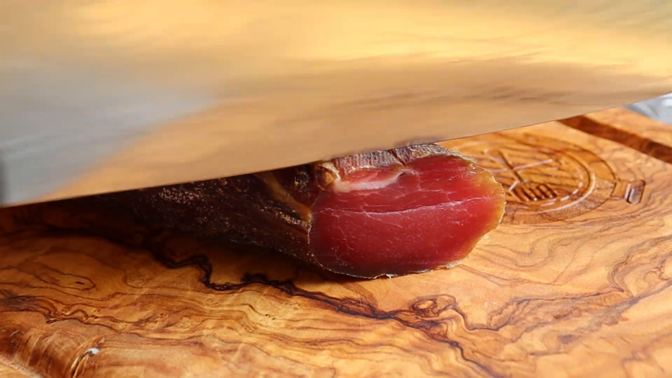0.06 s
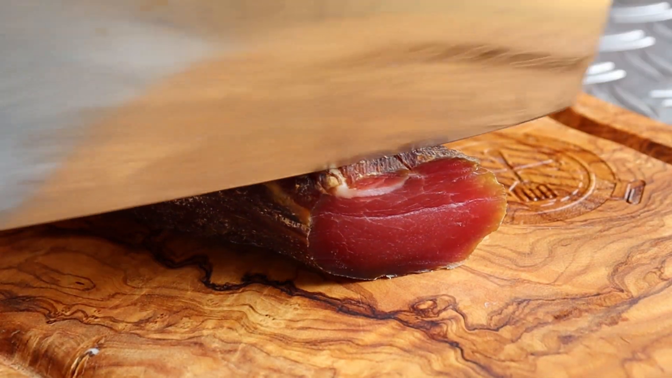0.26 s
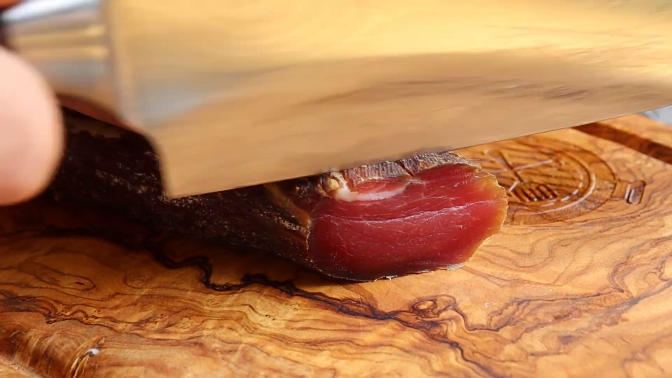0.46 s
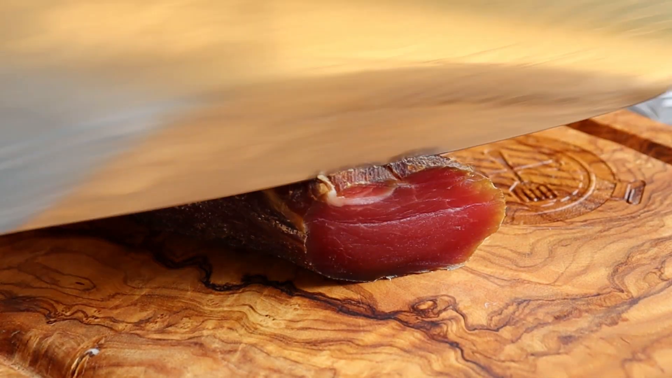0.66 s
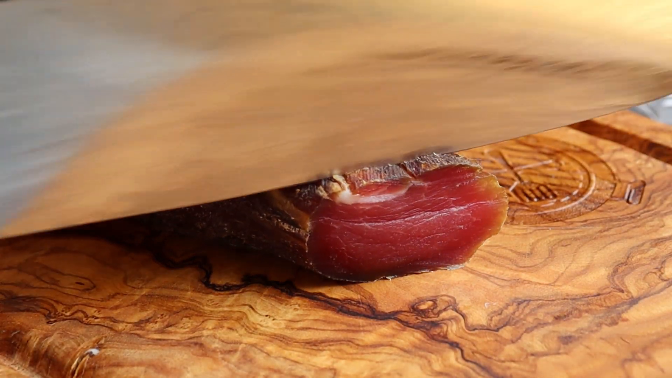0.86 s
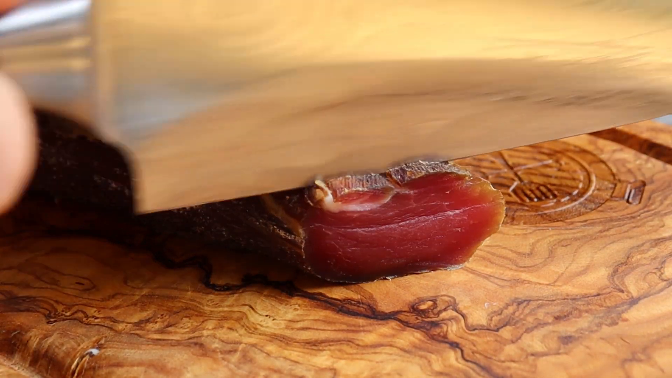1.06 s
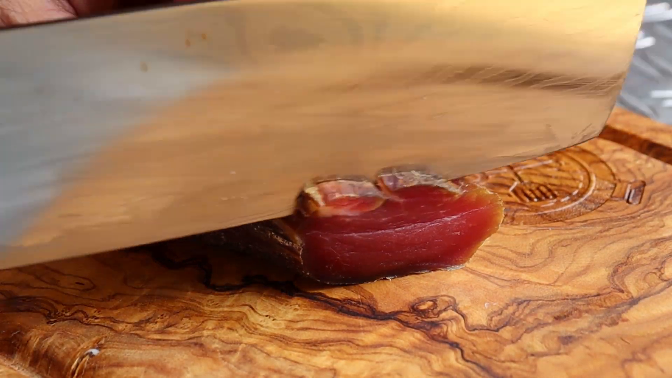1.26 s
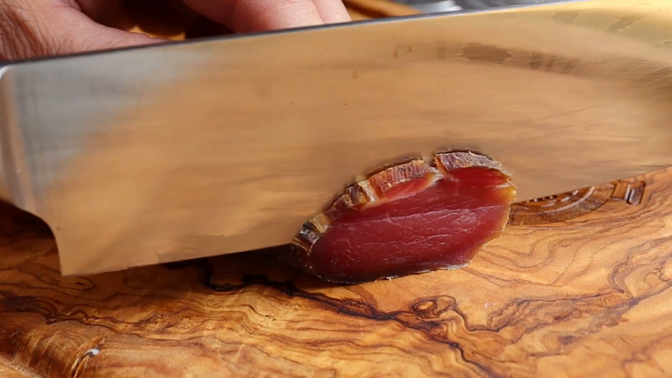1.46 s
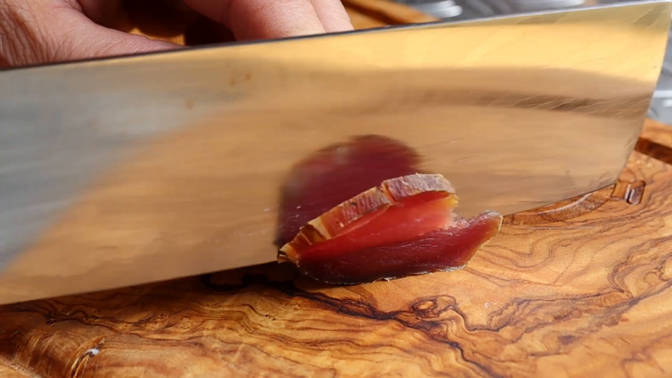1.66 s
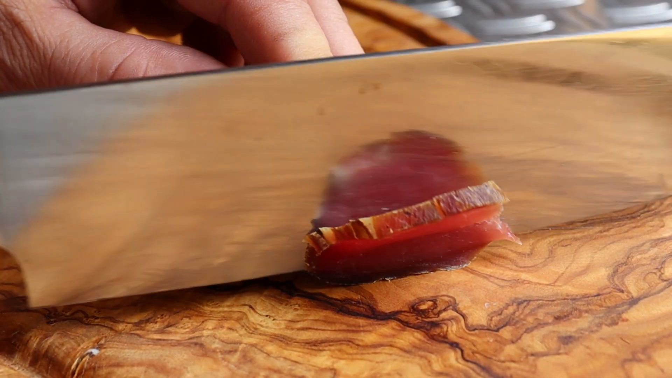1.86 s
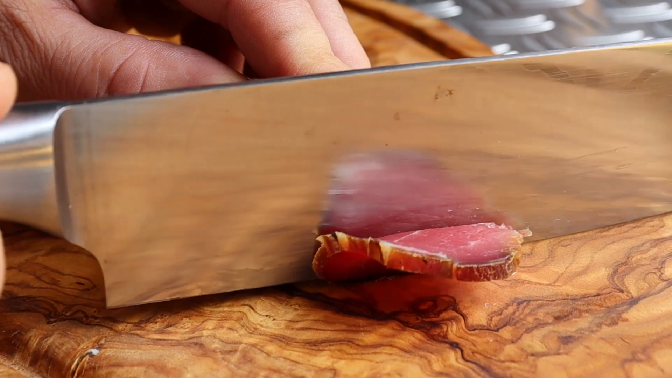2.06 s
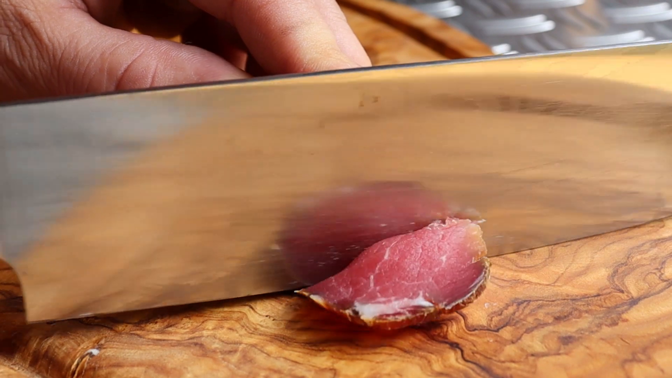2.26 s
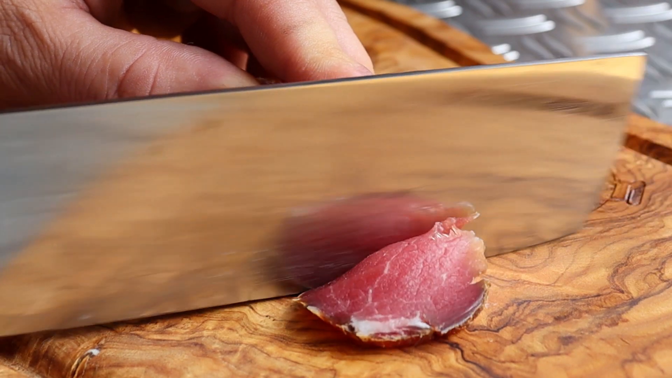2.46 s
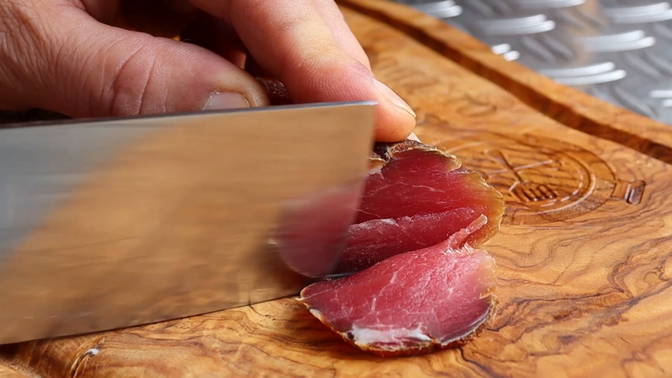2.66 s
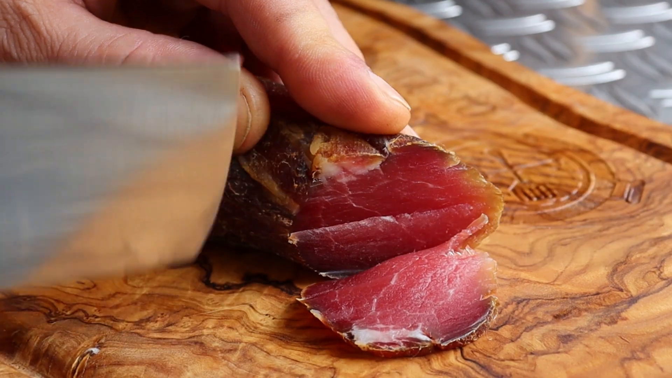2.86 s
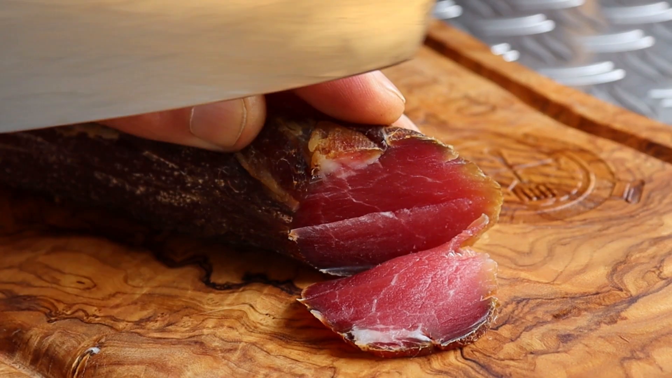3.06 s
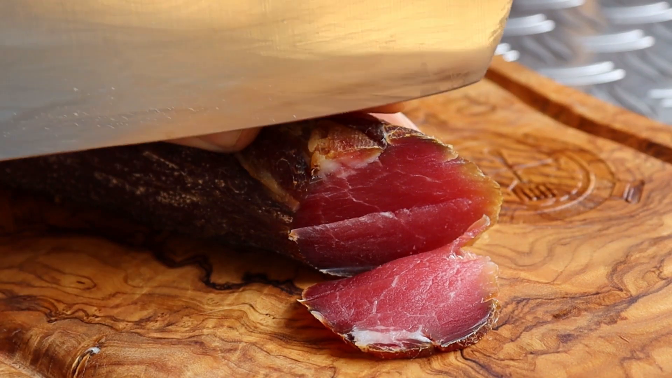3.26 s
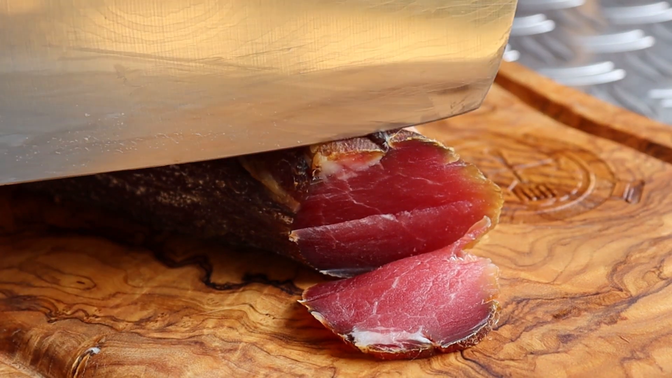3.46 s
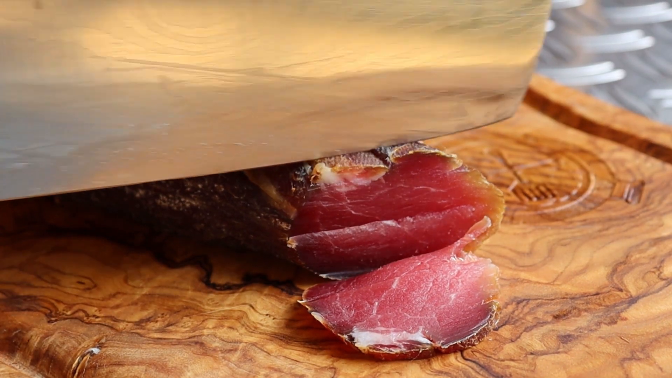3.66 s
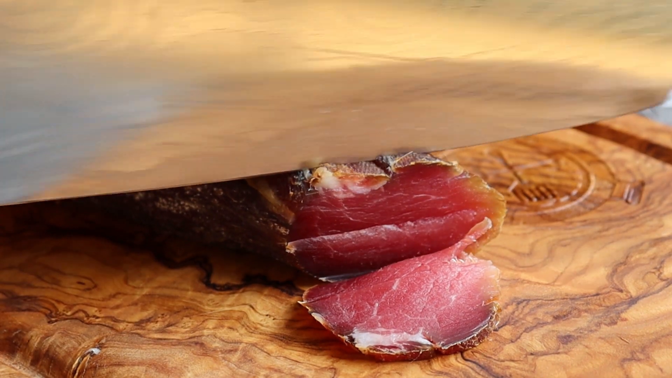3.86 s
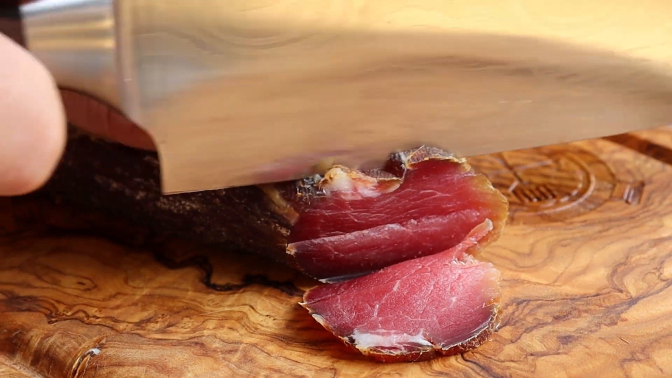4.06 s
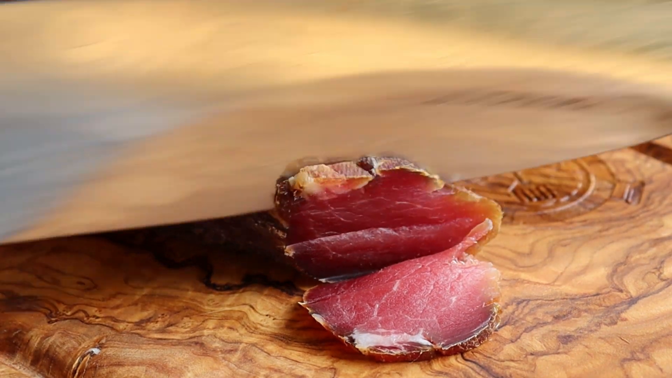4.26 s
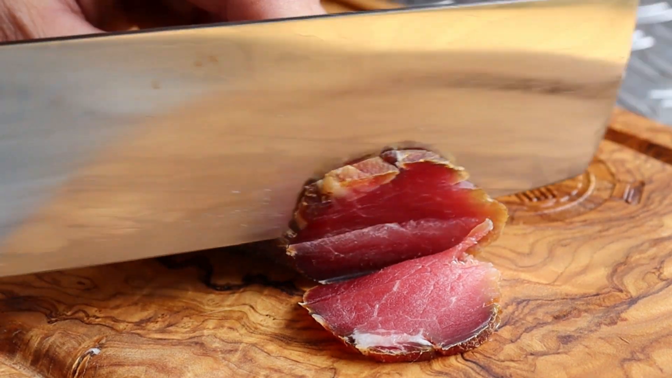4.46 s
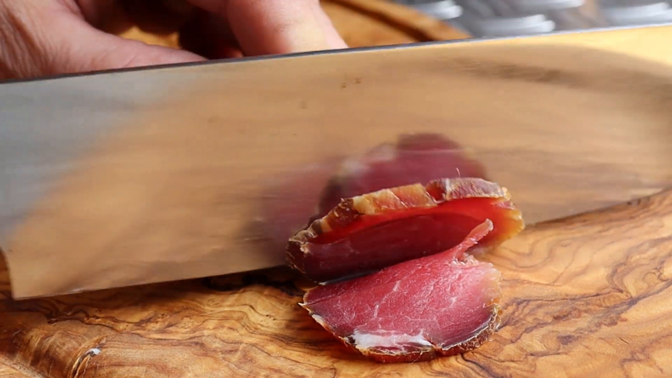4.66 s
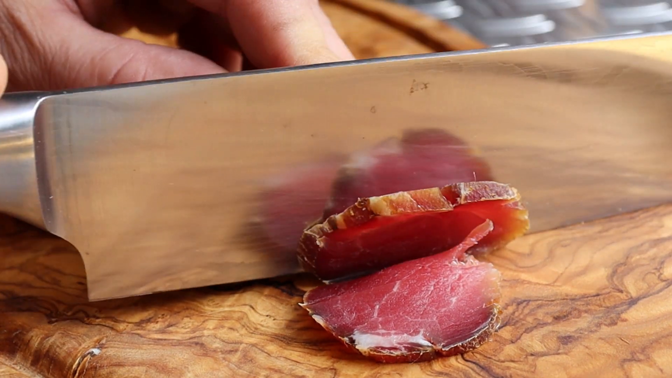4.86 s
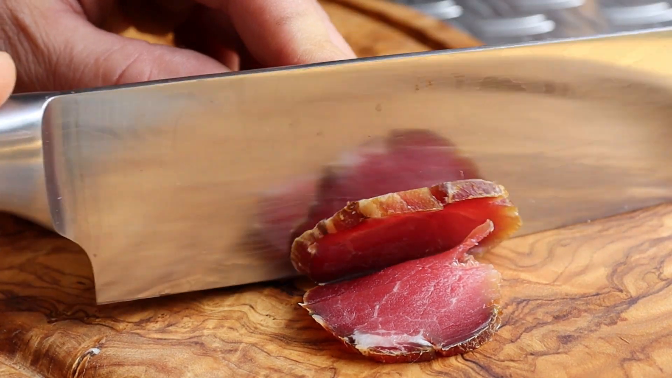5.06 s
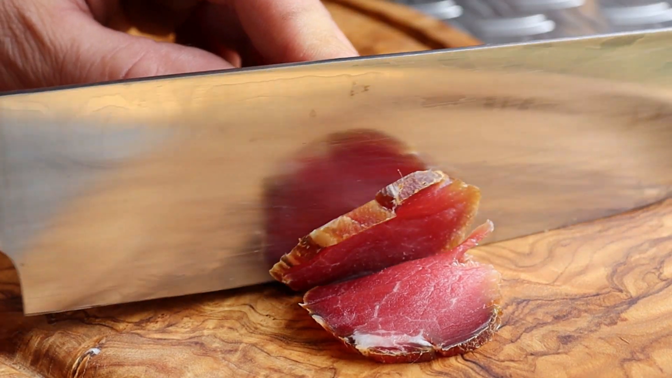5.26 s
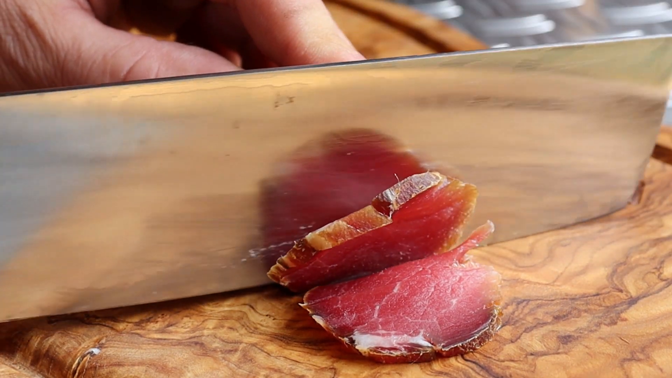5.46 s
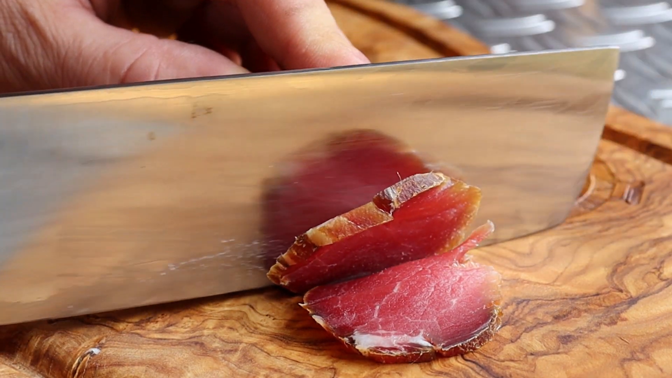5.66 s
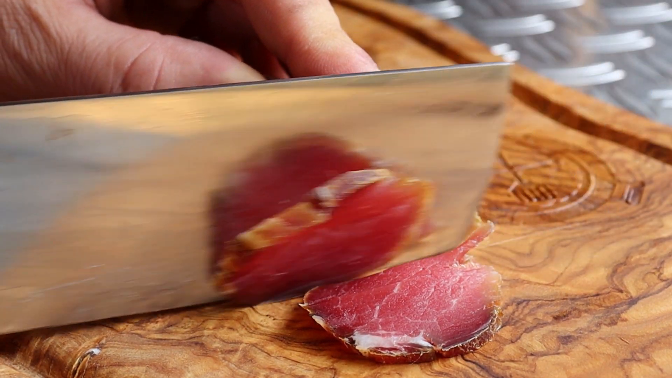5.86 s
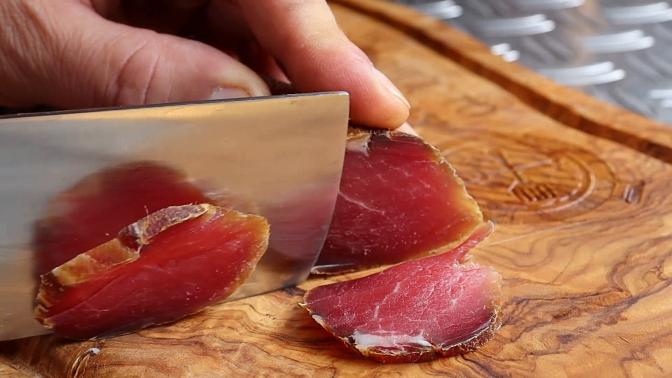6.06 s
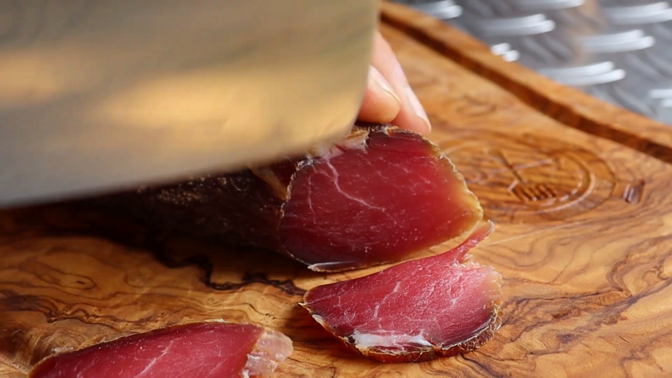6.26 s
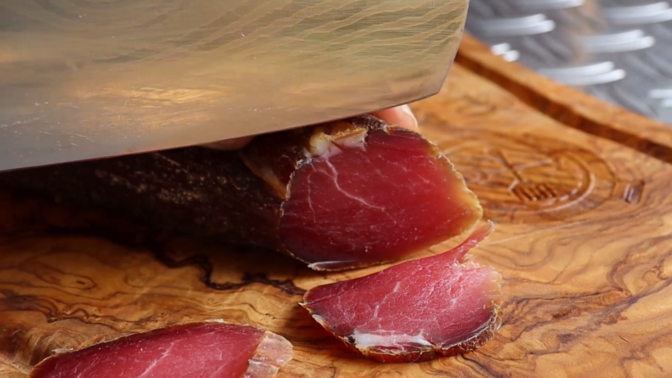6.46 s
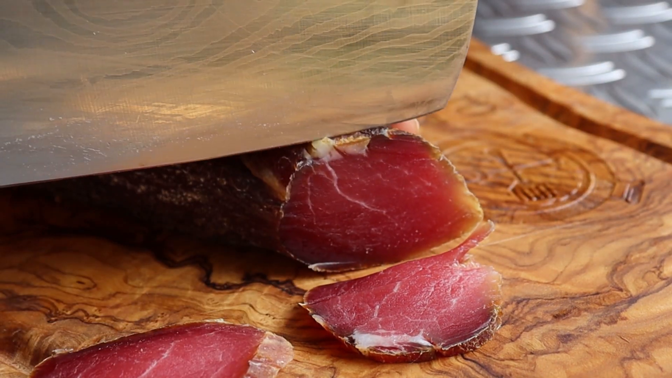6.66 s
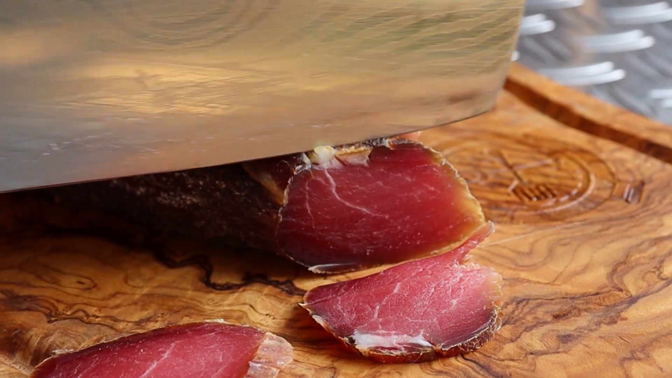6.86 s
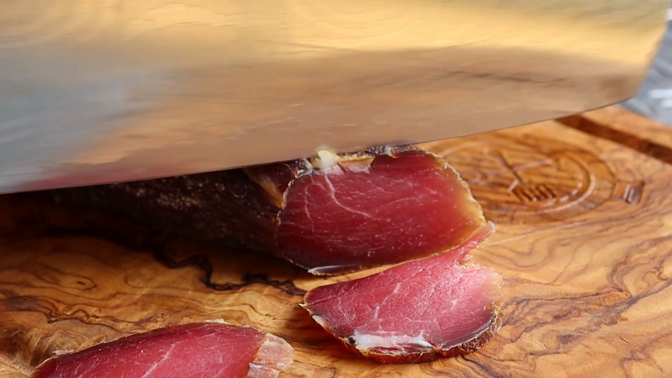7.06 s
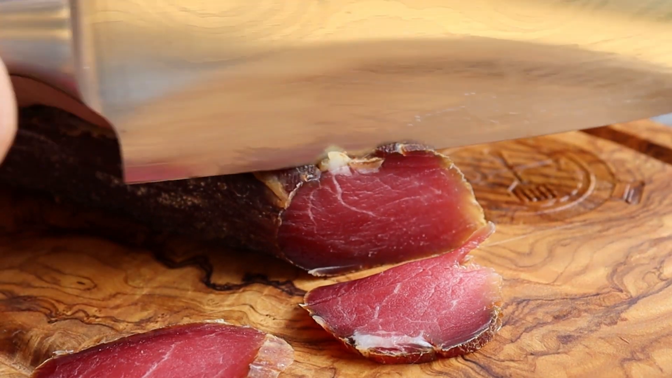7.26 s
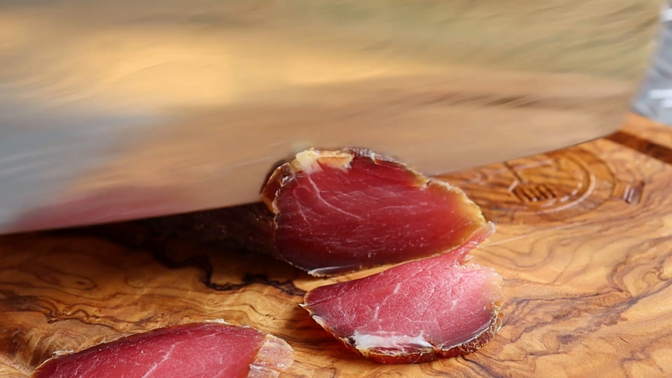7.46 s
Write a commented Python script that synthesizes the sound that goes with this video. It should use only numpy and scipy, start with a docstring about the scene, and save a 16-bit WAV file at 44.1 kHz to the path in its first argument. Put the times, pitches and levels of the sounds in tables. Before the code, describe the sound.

Close to one microphone in a kitchen, a big knife saws firm dried meat with quick back-and-forth rasps. The edge breaks through with clacks and woody thuds, then drags across the board with a scrape and bright squealing ring. After a pause, slower strokes bring snapping rind, a hard knock and another long scrape. A short creak and soft strokes end it over steady hiss and low table rumble.

```python
"""A dry rasp comes and goes as a large kitchen knife saws a firm cured ham, close to one microphone.
The table rumbles and a soft hiss fills the kitchen. Random slips of the blade make the rasp and low board
sounds; short bursts of noise make the snapping rind, the knocks onto wood and a late creak.
Twice the edge is dragged out across the board: the wood scrapes, and the blade sings, squeals and rings."""
import sys
import numpy as np
from scipy import signal
from scipy.fft import rfft, irfft, next_fast_len
from scipy.io import wavfile
from scipy.ndimage import uniform_filter1d, map_coordinates

SR = 44100
rng = np.random.default_rng(int(sys.argv[2]) if len(sys.argv) > 2 else 0)


def int16_out(signal):
    """Quantize to a 16-bit WAV file."""
    q = np.round(np.clip(np.atleast_2d(signal).T, -1, 1) * 32767)
    wavfile.write(sys.argv[1], SR, q.astype(np.int16))


N = 331632  # length in samples, about 7.5 s


def amp(db):
    """Turn decibels into a gain."""
    return 10 ** (np.asarray(db) / 20)


def unit(x):
    """Scale to an rms (average strength) of 1."""
    return x / np.sqrt(np.mean(x ** 2) + 1e-20)


def along(points, hz):
    """Read a curve of (pitch_hz, value) points on a log pitch axis."""
    point_hz, values = np.transpose(points)
    return np.interp(np.log(hz + 1), np.log(point_hz), values)


def arch(start, rise, fall):
    """The speed of one hand movement: from rest up to 1 and back to rest."""
    ramp = np.interp(np.arange(N) / SR - start, [0, rise, rise + fall], [0, 1, 0])
    return np.sin(np.pi / 2 * ramp)


def cusp(peak, rise, fall):
    """An exponential swell to 1 at the peak time, then an exponential fade."""
    t = np.arange(N) / SR - peak
    exponent = np.minimum(t / rise, -t / fall)
    return np.exp(np.maximum(exponent, -30))


def wobble(rate):
    """A smooth random curve with this many knots a second."""
    knots = rng.standard_normal(int(N * rate / SR) + 4)
    return map_coordinates(knots, [np.arange(N) * rate / SR])


def filtered(x, response):
    """Pass x through a response given as a function of frequency."""
    n = x.shape[-1]
    padded = next_fast_len(n + SR // 4)
    hz = np.fft.rfftfreq(padded, 1 / SR)
    return irfft(rfft(x, padded) * response(hz), padded)[..., :n]


def coloured(x, spectrum):
    """Shape the tone of x with a smooth spectrum."""
    return filtered(x, lambda hz: amp(along(spectrum, hz)))


def resonate(x, modes):
    """Let x ring a body's resonances, added with alternating signs."""
    def response(f):
        total = 0
        for k, (centre, width, db) in enumerate(modes):
            peak = 1j * f * width / (centre * centre - f * f + 1j * f * width)
            total = total + (-1) ** k * amp(db) * peak
        return total

    return filtered(x, response)


def unit_in(x, band):
    """Scale x so that one band of it, in Hz, has rms 1."""
    return x / np.std(filtered(x, lambda hz: (hz > band[0]) & (hz < band[1])))


def friction(rate, spread_db, smooth):
    """Tiny slips of uneven size at random moments (rate a second), over a smooth rubbing noise."""
    happens = rng.random(N) < rate / SR
    direction = rng.choice([-1, 1], N)
    size = amp(spread_db * np.clip(rng.standard_normal(N), -2, 2))
    slips = happens * direction * size
    return unit(unit(slips) + smooth * rng.standard_normal(N))


def burst(t60):
    """A contact: a noise that builds within about a millisecond and decays by 60 dB every t60 seconds."""
    t = np.arange(SR // 4) / SR
    rise = 1 - np.exp(-t / .0004)
    return rng.standard_normal(len(t)) * rise * amp(-60 * t / t60)


def add(track, s, db, sound):
    """Put a sound at time s, scaled so that its whole energy, packed into 10 ms, has this level."""
    part = track[round(s * SR):][:len(sound)]
    scale = np.sqrt(.01 * SR / np.sum(sound ** 2))
    part += (amp(db) * scale * sound)[:len(part)]


BEND_DEPTH = .05  # share of pitch by which the travelling contact point bends the blade's modes
ROCK_DEPTH, ROCK_S = .042, .225  # the blade rocks on its tip as a drag ends: share of pitch, period in s


def blade_bend():
    """Pitch ratio of the blade: it climbs on a push, sinks on a pull, and swings as the blade rocks."""
    t, bend = np.arange(N) / SR, np.ones(N)
    for s, rise, fall, direction, _, _ in STROKES:
        on = (t >= s) & (t < s + rise + fall)
        progress = (t[on] - s) / (rise + fall)
        bend[on] = 1 - np.sign(direction) * BEND_DEPTH * np.cos(np.pi * progress)
    for s, _, length, steady, ratio, _, _ in DRAGS:
        on = (t >= s) & (t < s + length + ROCK_S)
        rocking_s = np.maximum(t[on] - s - steady, 0)
        bend[on] = ratio + ROCK_DEPTH * np.cos(2 * np.pi * rocking_s / ROCK_S)
    return bend


# the blade's modes while it is held against ham or wood: (pitch_hz before bending, relative level_db)
BLADE_HELD = [(3700, 10), (4200, 4), (4650, 2), (5150, -0.5), (5950, 1.5), (6900, 1.5), (7800, -13),
              (8150, 2.5), (8900, -8), (9500, 4.5), (10200, -5), (11100, 3), (11700, -1.5), (12300, 1),
              (12800, -4), (13400, -8), (14000, -18), (14700, -9.5), (15300, -9)]


def blade_song():
    """Friction keeps the blade's modes ringing; they glide, and swell and fade at random."""
    t, knots = np.arange(N) / SR, np.linspace(0, N / SR, 6000)
    bend, out = blade_bend(), np.zeros(N)

    def drift(size):
        """A random curve, smoothed twice over this many knots."""
        once = uniform_filter1d(rng.standard_normal(len(knots)), size)
        return unit(uniform_filter1d(once, size))

    for hz, db in BLADE_HELD:
        pitch = hz * bend * np.interp(t, knots, 1 + .022 * drift(size=56))
        phase = (2 * np.pi * (np.cumsum(pitch) / SR % 1)).astype('float32')
        level = amp(db + 3.5 * drift(size=36))
        # the rubbed mode is a narrow noise: it forgets its phase in a few milliseconds
        for carrier in np.sin(phase), np.cos(phase):
            flutter = drift(size=3) + .6 * drift(size=1)
            out += np.interp(t, knots, level * flutter) * carrier
    return out


# sawing strokes through the ham:
# (start_s, speeding_up_s, slowing_down_s, direction push +1 or pull -1, rasp_db, pressing_db)
STROKES = [(-.05, .24, 0.17, -1, -47.5, -57.5), (0.269, 0.16, .2, 1, -50, -65),
           (0.651, .11, 0.1, -1, -54, -63), (.885, 0.041, 0.24, 1, -51.5, -61.5),
           (1.14, .15, 0.065, -1, -52, -53), (1.35, 0.07, .17, 1, -50.5, -47.5),
           (1.62, 0.096, 0.058, -1, -53.5, -51.5), (1.78, 0.053, 0.3, 1, -53.5, -48),
           (3.55, 0.25, 0.15, -1, -61.5, -70), (3.88, 0.088, 0.24, 1, -55, -70),
           (4.235, .15, .1, -1, -51, -52.5), (4.515, 0.1, .19, 1, -51, -48), (4.8, .12, .2, 1, -61, -47),
           (6.849, 0.3, .26, 1, -56.5, -65), (7.38, 0.13, 0.14, -1, -53.5, -66)]
# tone of the rasp: (pitch_hz, relative level_db per Hz)
RASP = [(120, -11), (205, 5), (255, 8.5), (340, -0.5), (600, -6), (820, 6.5), (1200, -1.5), (2000, -2.5),
        (3000, -0.5), (3550, 3), (4200, -6), (5400, 2.5), (7300, -8.5), (9000, -8.5), (15800, -4.5)]
RASP_GROWS = 0.95  # rasp amplitude goes as this power of the blade's speed


def sawing(steel):
    """Each stroke tears fine grains from the rind and faintly rings the blade, louder the faster it moves."""
    treble = (7000, 16000)  # Hz
    grains = friction(rate=5000, spread_db=4.5, smooth=.9)
    rasp = unit_in(coloured(grains, RASP), treble)
    song = .7 * unit_in(steel, treble)
    level = sum(amp(db) * arch(s, rise, fall) ** RASP_GROWS for s, rise, fall, _, db, _ in STROKES)
    flicker = amp(1.24 * wobble(70))
    return level * flicker * (rasp + song)


# the board's low and high resonances: (pitch_hz, width_hz, relative level_db)
BOARD_LOW = [(59.5, 30, -6), (100.3, 15.2, 0), (150.3, 41, -2.5), (176, 31.5, -1.5), (255, 9.8, -5.5),
             (462, 28, -13)]
BOARD_HIGH = [(531, 24, -11), (682, 45, -5), (754, 63, -5.5), (848, 40, 1), (1040, 260, -13),
              (1327, 34, -9), (1810, 430, -23.5)]
PRESS_PEAK = .62  # share of a stroke at which the force is greatest
DIG_SHAKE_DB = -18.5  # shaking of the board in a dig, relative to the dig's wood level


def pressing():
    """The ham sticks and gives under the blade and shakes the board, most strongly late in a stroke."""
    force = friction(rate=420, spread_db=4, smooth=0.5)
    low = unit(resonate(force, BOARD_LOW))
    high = unit(resonate(force, BOARD_HIGH))
    level = np.zeros(N)
    for s, rise, fall, _, _, db in STROKES:
        length = rise + fall
        level += amp(db) * arch(s, PRESS_PEAK * length, (1 - PRESS_PEAK) * length)
    for s, rise, fall, db, _, _ in DIGS:
        level += amp(DIG_SHAKE_DB) * amp(db) * cusp(s, rise, fall)
    return level * (amp(-2.0) * low + amp(-0.5) * high)


# shoves that set the table swaying: (start_s, length_s, level_db)
SHOVES = [(1.981, 0.56, -55), (3.457, 0.16, -52.5), (3.902, 0.63, -46.5), (4.598, .55, -57),
          (5.279, 0.68, -41.5), (5.931, 0.15, -32.5), (6.133, 0.36, -35), (6.448, .6, -57.5),
          (7.1, 0.11, -47), (7.273, 0.34, -35)]
# tones of the table's rumble and the kitchen's hiss: (pitch_hz, relative level_db per Hz)
RUMBLE = [(8.8, -37), (15, -5), (27, 3.5), (43, -3), (86, -17), (119, -20.5), (150, -32.5), (200, -50),
          (330, -120)]
KITCHEN = [(26, -29), (45, -5), (81, -10.5), (162, -9.5), (222, -8.5), (382, -9.5), (411, -12.5),
           (925, -4.5), (1020, -4.5), (1150, -7.5), (1270, -8), (2240, -8.5), (3850, -8), (16000, -29.5)]
SWAY_REST_DB, SWAY_STROKE_DB = -67, -61  # the table at rest; what any stroke adds


def background():
    """The table's slow rumble, stirred by every stroke and shove, and the kitchen's gently wavering hiss."""
    strokes = sum(arch(s, rise, fall) for s, rise, fall, *_ in STROKES)
    shoves = sum(amp(db) * arch(s, length / 2, length / 2) for s, length, db in SHOVES)
    sway = amp(SWAY_REST_DB) + amp(SWAY_STROKE_DB) * strokes + shoves
    rumble = unit(coloured(rng.standard_normal(N), RUMBLE)) * sway
    hiss_level = amp(-49.5 + 1.13 * wobble(3.93))
    hiss = unit(coloured(rng.standard_normal(N), KITCHEN)) * hiss_level
    return rumble + hiss


# dry rind and fibres snapping: (start_s, mid crack level_db, treble snap level_db), levels before trim
RIND_SNAPS = [(1.243, -42, -46), (1.258, -41, -47), (1.298, -41.5, -44), (1.3647, -42, -48),
              (1.406, -48, -43), (1.640, -43, -48), (1.725, -39, -42.5), (2.181, -40, -44.5),
              (2.224, -41, -49), (4.246, -52, -47), (4.6003, -39.5, -35.5), (4.6455, -40, -41.5),
              (4.679, -42, -46), (4.865, -43, -52), (4.903, -46, -52), (5.2003, -39, -47),
              (5.3, -35.5, -43), (5.5954, -32.5, -42), (5.817, -37, -49)]
# tones of the crack and the snap: (pitch_hz, relative level_db per Hz)
CRACK = [(500, -5.5), (1800, -2.5), (3500, -12), (5200, 3.5), (7000, -23), (15000, -25)]
SNAP = [(500, -17), (3000, 1.5), (6000, 1.5), (9000, 3), (13000, 2), (16000, 0.5)]


def snaps():
    """Bits of dry rind break with a dry tick: two very short noises, one mid and one treble."""
    out = np.zeros(N)
    life = .011  # s to fade by 60 dB
    for s, crack_db, snap_db in RIND_SNAPS:
        add(out, s, crack_db - 5.0, coloured(burst(t60=life), CRACK))
        add(out, s, snap_db + .5, coloured(burst(t60=life), SNAP))
    return out


# how long the kitchen answers: (pitch_hz, time to fade by 60 dB in s)
ROOM = [(150, 0.25), (900, 0.24), (4000, 0.073), (14000, 0.2)]


def room(x):
    """The kitchen's short answer, 5 ms late: a fading noise whose upper middle dies away soonest."""
    hz, t, noise = signal.stft(rng.standard_normal(SR // 2), SR, nperseg=256)
    fade = amp(-60 * t / along(ROOM, hz)[:, None])
    tail = signal.istft(noise * fade, SR, nperseg=256)[1]
    late = np.pad(x, (SR // 200, 0))
    return signal.fftconvolve(late, tail / np.linalg.norm(tail))[:N]


# the knife striking ham and board:
# (start_s, thud_db, dull slap_db, wood_db, steel clack_db, treble snap_db)
KNOCKS = [(1.606, -38, -47, -40, -31.5, -36), (1.6177, -51, -42, -45, -42, -50),
          (1.63, -51, -42, -55, -55, -60), (1.994, -44, -58, -38, -56, -66),
          (2.0173, -48, -41, -34.5, -38, -45.5), (2.0554, -42, -46.5, -41, -43, -53),
          (2.2338, -40.5, -44, -48, -46, -46), (2.268, -56, -47.5, -38, -52, -46),
          (3.415, -53.5, -54, -60, -64, -64), (3.991, -53, -52, -45.5, -50, -49),
          (4.267, -41.5, -55, -45, -55, -43), (4.698, -44, -64, -54, -48, -50),
          (4.84, -42, -56, -47, -62, -66), (4.888, -35.5, -54, -44, -42.5, -46),
          (5.0273, -36.5, -49, -26.5, -44.5, -48), (5.5668, -42, -51, -41, -43, -45),
          (6.118, -46.5, -56, -43.5, -65, -65), (6.3127, -47.5, -46, -30, -28, -43.5),
          (6.34, -55, -56, -42.5, -58, -66), (7.419, -49, -53, -60, -62, -60)]
# resonances of the damped ham and of the clacking steel: (pitch_hz, width_hz, relative level_db)
FLESH = [(233, 95, -3), (372, 120, -2.5), (460, 107, 0)]
CLACK = [(1710, 390, 2.5), (3050, 230, 3), (3580, 760, 5), (5140, 880, 1), (5440, 100, -23)]


def knocks():
    """The edge breaks through: the ham slaps, the board thuds and rings, the steel clacks."""
    out, t = np.zeros(N), np.arange(SR // 4) / SR
    blow = np.exp(-t / .00006)
    for s, thud_db, slap_db, wood_db, clack_db, snap_db in KNOCKS:
        add(out, s, thud_db, resonate(blow, BOARD_LOW))
        add(out, s, slap_db, resonate(burst(t60=0.045), FLESH))
        add(out, s, wood_db, resonate(blow + 0.39 * burst(t60=0.025), BOARD_HIGH))
        add(out, s, clack_db, resonate(burst(t60=0.012), CLACK))
        add(out, s, snap_db, coloured(burst(t60=0.017), SNAP))
    return out


# the edge dragged out across the wood: (start_s, attack_s, length_s, time until the blade rocks_s,
# middle of the blade's pitch swing as a ratio, wood_db, steel_db), levels before trim
DRAGS = [(2.21, 0.026, .67, .38, 0.97, -42, -54.5), (5.083, 0.21, 0.98, 0.82, 1, -42.5, -55.5)]
# the edge digs in during a drag: (peak_s, rise_s, fall_s, wood_db, steel_db, squeal_db),
# wood and steel levels before trim
DIGS = [(2.574, 0.052, 0.061, -28.5, -29.5, -31.5), (2.795, 0.013, 0.025, -54, -48, -41),
        (2.878, 0.032, .01, -52, -41, -45), (5.972, 0.063, 0.041, -30, -33.5, -38),
        (6.2, 0.023, .014, -46, -43, -50)]
DRAG_RELEASE_S = 0.027  # the edge lifts off the wood
STEEL_LAG, STEEL_SPAN = 0.55, 0.78  # steel bites later (in fall times) and more briefly (share of times)


def drag_levels():
    """Gains of the scrape on wood and the bite on steel: steady drags, with swells where the edge digs in."""
    t, scrape, bite = np.arange(N) / SR, np.zeros(N), np.zeros(N)
    for s, attack, length, _, _, wood_db, steel_db in DRAGS:
        held = np.interp(t - s, [0, attack, length, length + DRAG_RELEASE_S], [0, 1, 1, 0])
        scrape += amp(wood_db) * held
        bite += amp(steel_db) * held
    for s, rise, fall, wood_db, steel_db, _ in DIGS:
        scrape += amp(wood_db) * cusp(s, rise, fall)
        bite += amp(steel_db) * cusp(s + STEEL_LAG * fall, STEEL_SPAN * rise, STEEL_SPAN * fall)
    return scrape, bite


# resonances of the scraped wood: (pitch_hz, width_hz, relative level_db)
DRAGGED = [(519, 55, -7), (701, 46, 1), (848, 50, 5.5), (1143, 66, -4.5), (1306, 65, 0), (1613, 41, 3.5),
           (1732, 160, -0.5), (2204, 190, -1), (2348, 165, 1.5), (3060, 44, -22), (3280, 170, -10),
           (5240, 160, -12)]
# tones of the tearing wood grain and of the edge's grit: (pitch_hz, relative level_db per Hz)
TEARING = [(900, -20), (1500, -2), (2300, -2.5), (3000, 1), (3800, -15.5), (5000, -15), (7000, -36),
           (15000, -42)]
GRIT = [(300, -35), (1500, -14), (2700, 8.5), (4500, 16), (6500, 8), (9000, 2), (12500, 13.5), (15800, 3.5)]


def dragging(steel):
    """The edge scrapes the wood, tearing its grain when louder; a harder bite makes the steel sing more."""
    middle, treble = (1100, 3000), (7000, 16000)  # Hz
    slips = friction(rate=3500, spread_db=3, smooth=.6)
    wood = unit_in(resonate(slips, DRAGGED), middle)
    tear = unit_in(coloured(friction(rate=2500, spread_db=4.5, smooth=0.59), TEARING), middle)
    grit = unit_in(coloured(friction(rate=4700, spread_db=2.5, smooth=0.98), GRIT), treble)
    song = unit_in(steel, treble)
    scrape, bite = drag_levels()
    torn = scrape ** 2 / (scrape ** 2 + amp(-36) ** 2)  # share of the scrape that tears the grain
    sung = .3 + .55 * bite / (bite + amp(-46))  # share of the grit that turns into song
    on_wood = scrape * amp(-1.5) * (np.sqrt(1 - torn) * wood + np.sqrt(torn) * tear)
    on_steel = bite * amp(-2.0) * (np.sqrt(1 - sung) * grit + np.sqrt(sung) * song)
    return (on_wood + on_steel) * amp(0.99 * wobble(60))


SQUEAL_HZ = 5500  # the tip squealing on the wood, before bending
SQUEAL_LAG, SQUEAL_SPAN = 1.44, 0.99  # delay and width of the squeal, in fall times of its dig


def squeals():
    """As each dig eases, the tip sticks and slips on the blade's wavering pitch; other modes follow it."""
    pitch = SQUEAL_HZ * blade_bend()

    def tone(ratio):
        """One rough, broken line at a multiple of the pitch."""
        hz = ratio * pitch + 130 * wobble(600) + 60 * wobble(30)
        flicker = amp(3 * wobble(200) + 3 * wobble(35))
        return np.sin(2 * np.pi * np.cumsum(hz) / SR) * flicker

    level = np.zeros(N)
    for s, _, fall, _, _, db in DIGS:
        width = SQUEAL_SPAN * fall
        level += amp(db) * cusp(s + SQUEAL_LAG * fall, width, width)
    return level * unit(tone(1.0) + amp(-3.0) * tone(.79) + amp(-9.5) * tone(2.14))


# the blade left to ring after a touch or on leaving the wood: (start_s, level_db added to its modes)
RELEASES = [(2.886, 10), (3.485, 0), (6.208, 1)]
# the freely ringing blade's modes: (pitch_hz, level_db before the release's own level)
BLADE_FREE = [(3408, -61), (4129, -72), (5276, -61), (5652, -68), (7144, -68), (8210, -63), (8845, -60),
              (9453, -58), (11563, -64), (12242, -65)]


def releases():
    """Freed from contact, the blade rings on for a moment as a set of fading pure tones."""
    out, t = np.zeros(N), np.arange(SR // 2) / SR
    for s, db in RELEASES:
        ring = sum(amp(level) * np.sin(2 * np.pi * hz * t) for hz, level in BLADE_FREE)
        out[round(s * SR):][:len(t)] += amp(db - 60 * t / 0.28) * ring
    return out


# short creaks as the edge catches: (time_s, level_db before trim, swell_s)
CREAKS = [(7.0223, -30.5, 0.0024), (7.025, -37, 0.00108), (7.0315, -30.5, 0.0018), (7.0348, -24.5, .0016),
          (7.039, -34, 0.0028)]
# resonances of the creak: (pitch_hz, width_hz, relative level_db)
CREAK = [(994, 82, -1), (1280, 93, -9.5), (1760, 240, -13), (2600, 300, -6), (3080, 177, 5),
         (3360, 300, -1), (3720, 240, -8.5)]


def creaks():
    """A few quick slips, each a brief swell of noise, ring a set of narrow and wide resonances."""
    out, t = np.zeros(N), np.arange(SR // 4) / SR
    for s, db, swell in CREAKS:
        slip = rng.standard_normal(len(t)) * np.exp(-(t / swell - 2) ** 2)
        # each noise starts 3.5 swells before the listed time
        add(out, s - 3.5 * swell, db - 4.0, resonate(slip, CREAK))
    return out


def scene():
    """One microphone feeds both channels; only the snaps, knocks and creaks get a room answer."""
    steel = blade_song()
    cutting = sawing(steel) + pressing() + dragging(steel) + squeals() + releases()
    hits = snaps() + knocks() + creaks()
    mono = cutting + hits + amp(-10.5) * room(hits) + background()
    return np.array([mono, mono])


TOP_HZ = 15950


def record(dry):
    """The recorder keeps nothing above its band limit."""
    return filtered(dry, lambda hz: hz < TOP_HZ)


dry = scene()
out = record(dry)
int16_out(out)
```